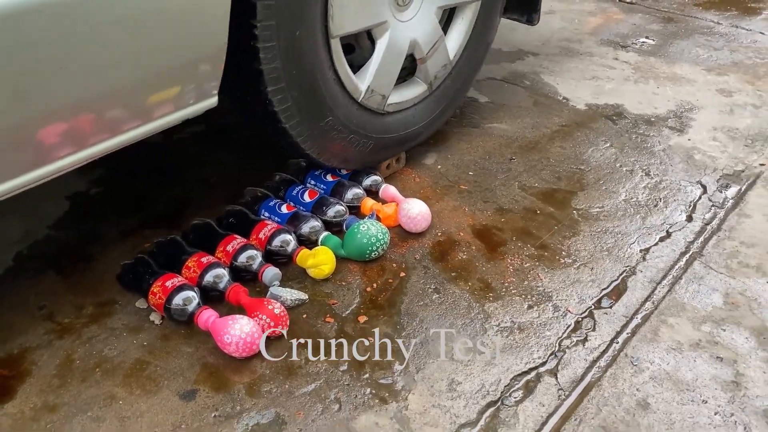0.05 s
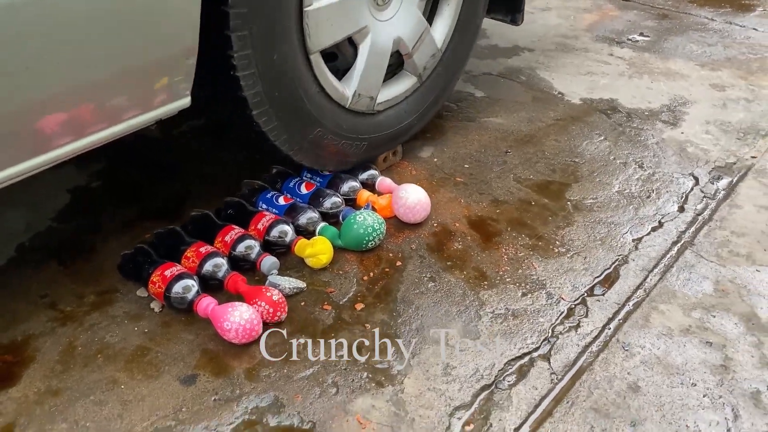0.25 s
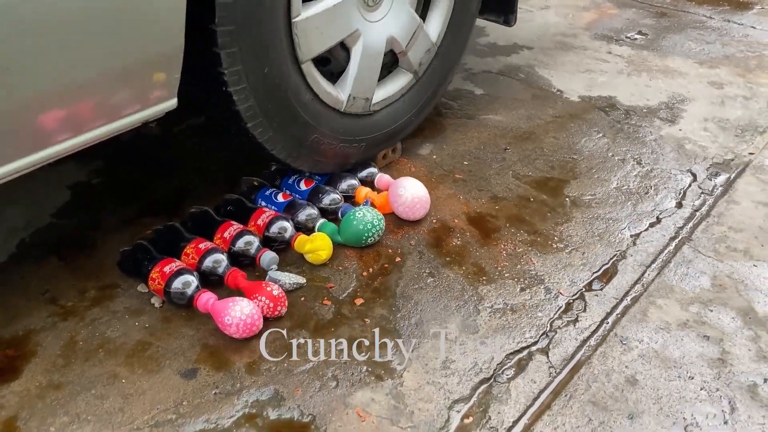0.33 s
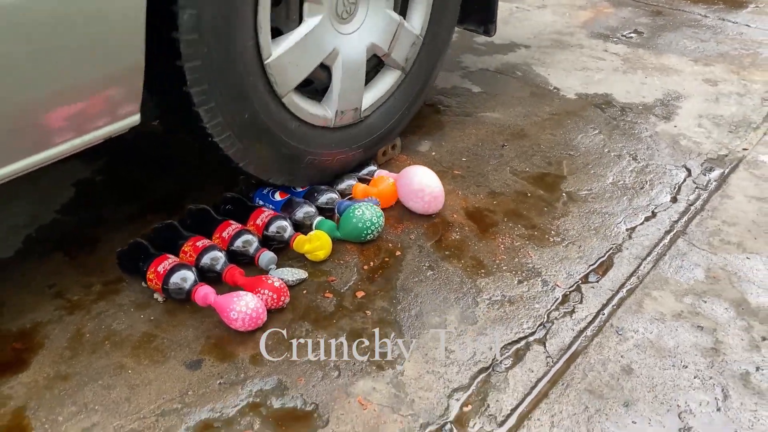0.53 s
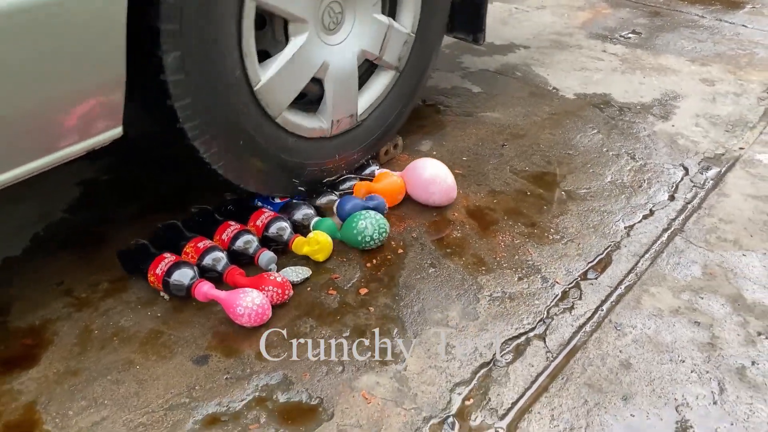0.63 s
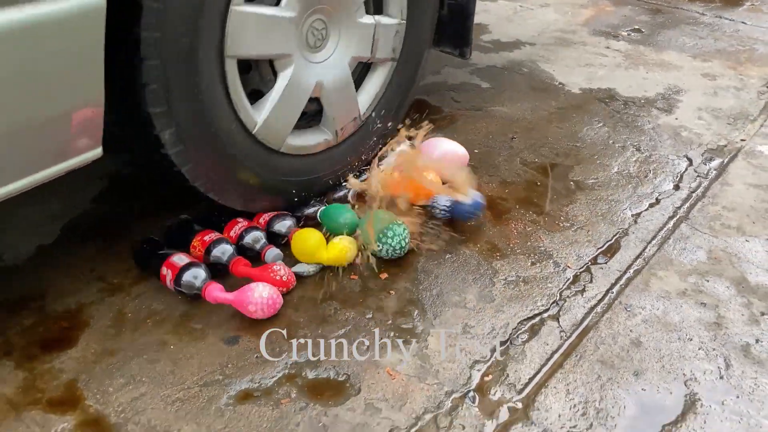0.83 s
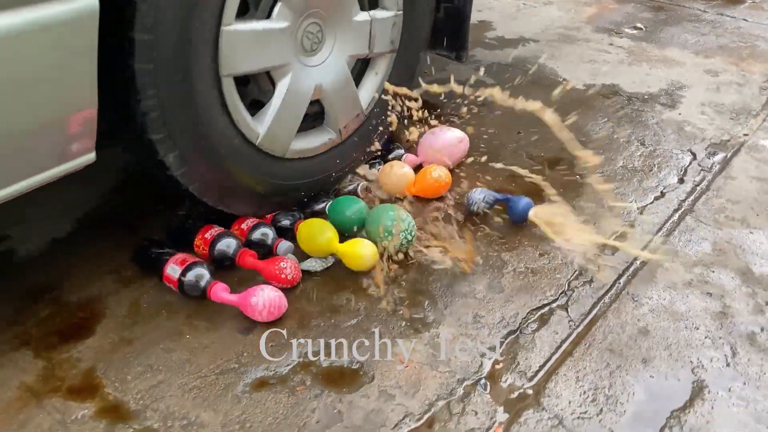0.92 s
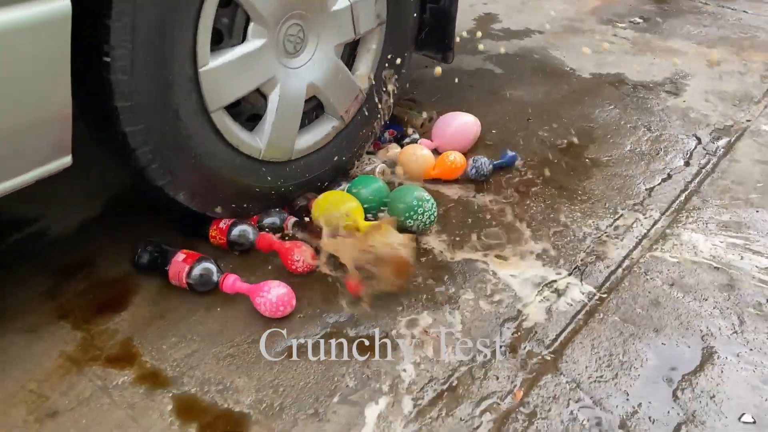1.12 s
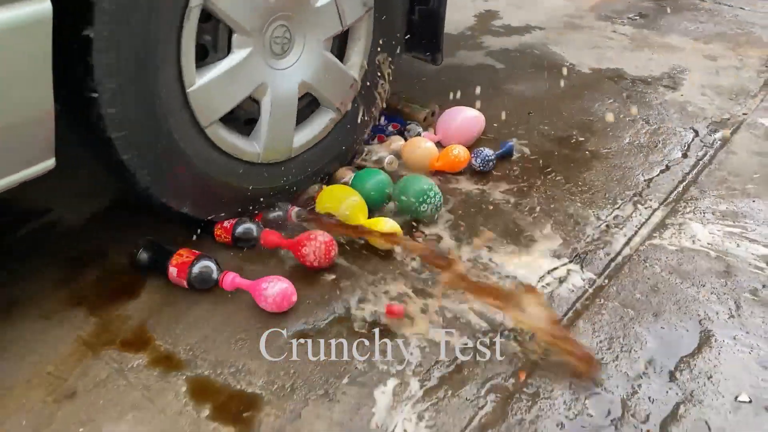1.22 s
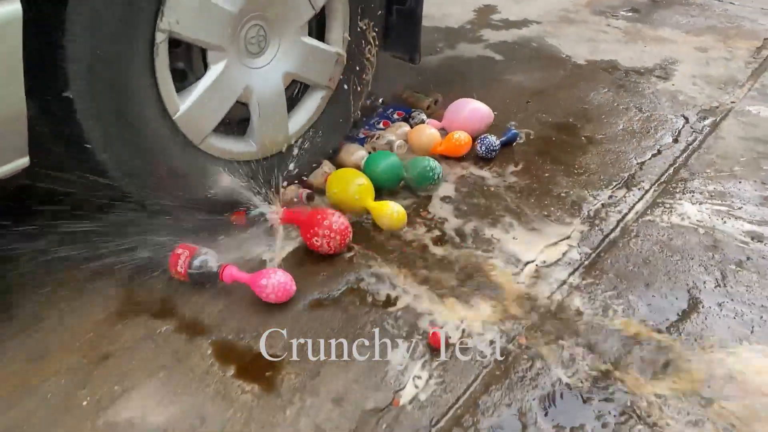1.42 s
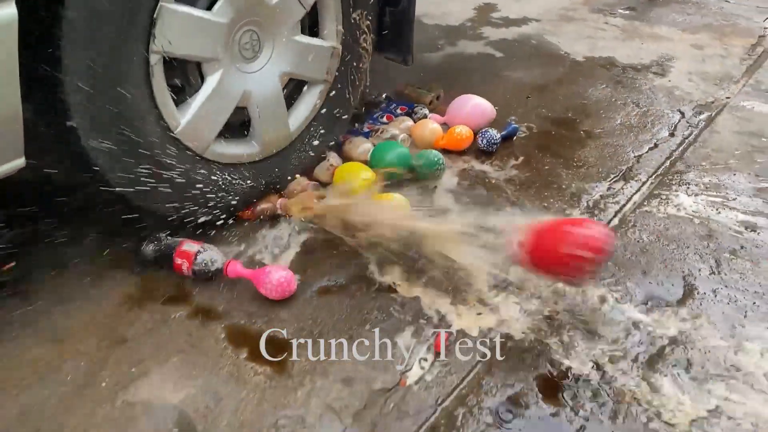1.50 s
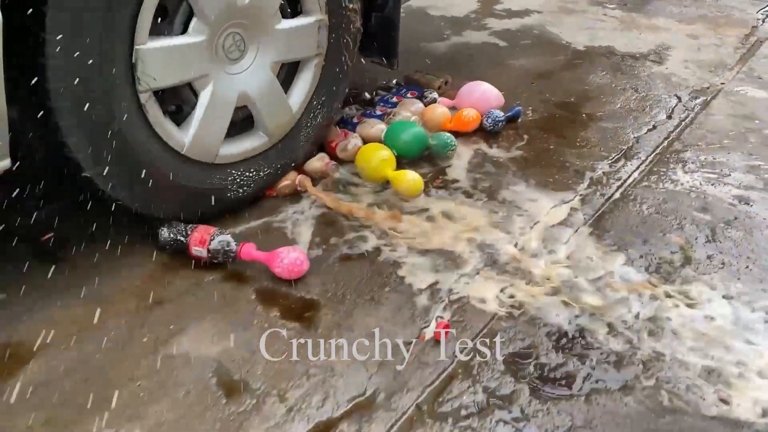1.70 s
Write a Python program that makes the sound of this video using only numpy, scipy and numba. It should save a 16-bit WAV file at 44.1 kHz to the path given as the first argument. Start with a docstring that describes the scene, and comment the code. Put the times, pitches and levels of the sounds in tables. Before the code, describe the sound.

Plastic soda bottles crack and pop under a slowly rolling car tyre. Gas squeals thinly at first, then sharp cracks and hollow thumps lead to one hissing burst. Liquid spatters on concrete over a faint idling engine, close by outdoors.

```python
"""On wet concrete, a car tyre rolls slowly over a row of plastic soda bottles capped with balloons.
Gas squeals through a stretched rubber neck, the bottles crack and thump as they fold, and one bursts in
a hissing spurt. Grit crunches under the tread and soda spatters on the ground, over a bed of idling
engine and a little wind on the microphone."""
import sys
import numpy as np
from scipy import signal
from scipy.fft import rfft, irfft
from scipy.io import wavfile
from scipy.ndimage import uniform_filter1d
from numba import njit

SR = 44100
rng = np.random.default_rng(int(sys.argv[2]) if len(sys.argv) > 2 else 0)


def store_wav(level_fs):
    """Save 16-bit WAV to argv[1]."""
    pcm = np.round(np.clip(np.atleast_2d(level_fs), -1, 1) * 32767)
    wavfile.write(sys.argv[1], SR, pcm.T.astype(np.int16))


N = 77175
START_S, TOP_HZ = .1365, 15800

# Bottle walls cracking. Each row: start in seconds, ring pitch in Hz, five EQ gains in dB
# (one per band of CRACK_EQ_HZ), tail level in dB against the snap.
WALL_CRACKS = [(0.2531, 2270, -4, -8, 1.5, 6, -5.5, 1.5), (0.2918, 2500, -4, 11.5, 25, -8, -9, -18),
               (0.434, 2647, -9, -4, 7, -14, -21, 0.5), (0.4911, 1810, -14, 9, 14, 13, 0.5, -5),
               (0.5818, 1360, 1, 9.5, 13, 3.5, -4, -4.5), (0.6809, 1870, -13, -1, 1.5, -11.5, -31, -1.5),
               (0.714, 1040, 8, 16, 17, 17, 11.5, -3.5), (0.745, 1350, -15, 1, 1, -12, -22, 3),
               (0.8062, 650, 10, 7.5, 2, -15, -11, -4), (0.8558, 1790, 19, 9.5, 15, 16.5, 13, -6),
               (0.911, 1920, 0, 3.5, 2, 0, -22, -3), (0.9885, 300, 2, -7, -2, -11, -9, 3.5),
               (1.0444, 1430, 26, 5.5, 15, 10.5, -10, -7.5), (1.0659, 1760, 11.5, 11, 10.5, 6.5, 5, -0.5),
               (1.1717, 750, 16.5, 17, 11.5, 17, -12, -3), (1.2526, 2320, 19.5, 13, 10, 9, 0.5, -1),
               (1.2854, 4500, -3, -25, -6, -5, -10, 0), (1.3647, 700, -1.5, -7, -8, -37, -19, 5.5),
               (1.3983, 1620, 1, 7.5, 6, -32, -11, -2.5), (1.4586, 616, 11, 1.5, 3, -3.5, -16, 8.5),
               (1.4736, 430, 15, 12.5, 2.5, 2, 3.5, -3.5), (1.5045, 1980, 5, 1, -14, -16, -16, -5),
               (1.582, 3760, 14.5, -2, 4, -4.5, -20, -13), (1.6678, 540, -1, -17, -10, -28, -38, 1.5),
               (1.7099, 3920, 11.5, -2, -1, 3, -5, -6), (1.747, 946, 18, 9, 3, 1, -6, -16)]
# The bands of the crack EQ in Hz, low to high.
CRACK_EQ_HZ = [400, 1050, 2300, 5300, 11500]
# Shells ringing after the hardest cracks. Each row: start in seconds, pitch in Hz, level in dB,
# attack and decay in seconds.
SHELL_MODES = [(.7142, 1675, -22, .0005, 0.009), (.7142, 2640, -13, 0.00027, 0.0034),
               (.7142, 4030, -12.5, 0.00027, 0.0024), (.8554, 2720, -15, .0003, 0.0026),
               (1.0444, 2980, -25, 0.00038, .003), (1.2522, 2265, -11, 0.00044, 0.006),
               (1.2522, 2520, -8, 0.00043, 0.0024)]
# Hollow thumps of bottles and filled balloons. Each row reads as in SHELL_MODES.
HOLLOW_THUMPS = [(0.6101, 313, -2.5, 0.0011, .0025), (.628, 860, -21, .001, 0.0066),
                 (.7145, 734, -11, 0.0013, 0.008), (.7145, 1064, -22.5, 0.0012, 0.014),
                 (.785, 460, -18, 0.0031, 0.0099), (0.796, 87.5, -20, 0.0036, 0.0095),
                 (0.985, 230, -15.5, 0.0017, 0.0049), (1.0443, 446, -5, 0.00021, 0.0026),
                 (1.167, 620, -11.5, 0.0025, 0.0088), (1.172, 954, -18.5, 0.0028, 0.011),
                 (1.44, 310, -15, .002, 0.0041), (1.458, 111, -22, 0.0013, 0.015),
                 (1.461, 375, -4, 0.0015, 0.0055), (1.473, 461, -13.5, 0.0014, 0.011),
                 (1.6675, 506, -25, 0.00044, 0.0088)]
# The burst's envelope. Each row: time in seconds, jet level in dB, spray level in dB.
BURST_LEVELS = [(1.11, -71, -69), (1.14, -55, -48), (1.165, -51, -43), (1.182, -19.5, -25.5),
                (1.198, -10.5, -11.5), (1.205, -24, -15), (1.213, -5, -16), (1.23, -21, -13.5),
                (1.24, -24, -41), (1.275, -45, -47), (1.36, -47, -45), (1.42, -66, -77)]
# The jet's resonances at the height of the burst. Each row: centre in Hz, width in Hz, relative dB.
JET_RESONANCES = [(4470, 60, -3), (4825, 280, 2), (5430, 200, 0), (5900, 160, -1), (6250, 180, 4.5),
                  (9000, 700, -7), (3260, 240, -11), (1880, 780, -7)]
# Spits of gas ahead of the burst. Each row: peak time in seconds, centre in Hz, level in dB.
GAS_SPITS = [(1.129, 6500, -30.5), (1.143, 4200, -33), (1.163, 3600, -25)]
# The neck's squeal and the falling whistle below it. Each row: time in seconds, pitch in Hz, level in dB.
SQUEAL_PATH = [(.137, 5380, -28.5), (.15, 5400, -29.5), (.163, 5343, -35), (.187, 5380, -44),
               (.2, 5400, -32.5), (.235, 5380, -28.5), (.27, 5065, -30), (.3, 5040, -29.5),
               (.33, 5080, -24), (.35, 5042, -25), (.366, 4860, -25), (.387, 4873, -23.5), (.41, 5080, -27),
               (.436, 5500, -30.5), (.452, 5460, -35), (.47, 5270, -49), (.5, 5500, -110)]
LOW_WHISTLE_PATH = [(.137, 1740, -42), (.22, 1680, -36), (.3, 1580, -33.5), (.4, 1510, -39),
                    (.47, 1160, -32.5), (.53, 1000, -41), (.58, 1000, -110)]
# One faint high whistle: peak time in seconds, half-width in seconds, pitch in Hz, level in dB.
HIGH_WHISTLE = (.22, .028, 6700, -39)
# Fader moves for the grinding tread and the spattering soda. Each row: time in seconds, level in dB.
TREAD_LEVELS = [(.137, -45), (.35, -40.5), (.5, -40.5), (.56, -34), (.63, -30.5), (.69, -38.5),
                (.74, -28.5), (.77, -36.5), (.8, -29), (.84, -32.5), (1.02, -35), (1.11, -39), (1.27, -29),
                (1.33, -40), (1.42, -43), (1.47, -29), (1.53, -37.5), (1.64, -41), (1.75, -41.5)]
SODA_LEVELS = [(.137, -42.5), (.25, -38), (.5, -33.5), (.56, -39.5), (.69, -43.5), (.735, -39.5),
               (.77, -34), (.84, -41), (.875, -35), (.94, -40.5), (1.08, -43.5), (1.11, -41), (1.28, -42),
               (1.36, -37), (1.45, -39), (1.51, -58), (1.523, -30), (1.55, -45), (1.68, -55), (1.75, -58)]
# The idling engine's partials. Each row: pitch in Hz, level in dB.
ENGINE_PARTIALS = [(178.8, -44), (127, -49.5), (51, -50.5), (394, -70), (452.6, -57)]
# EQ curves for soda spray, escaping gas, tread, droplets and wind.
# Each row: frequency in Hz, relative gain in dB.
SPRAY_EQ = [(300, -21), (1000, -8), (2200, -7.5), (3500, -2.5), (5000, 8), (7000, 2.5), (10000, -1),
            (13000, -7.5), (16000, -15)]
GAS_EQ = [(300, -33), (1000, -16), (2500, 4), (4500, 10), (7000, 6), (10000, 2), (13000, -18), (16000, -19)]
TREAD_EQ = [(120, -29), (250, -1), (450, -4), (800, -1), (1300, -7.5), (2200, -8.5), (4000, -18),
            (9000, -23), (16000, -39)]
DROPLET_EQ = [(400, -16.5), (1200, 5), (2500, 1.5), (4500, 2), (7000, -3.5), (11000, -8), (16000, -7)]
WIND_EQ = [(6, 5.5), (14, 0.5), (25, -4), (38, -12), (60, -19.5), (130, -15), (220, -15), (400, -34.5),
           (1500, -42), (8000, -73)]


def bottle_cracks(size=4096, snap_s=.00049, tail_s=.011):
    """A wall snaps through, flutters for a millisecond and rings; the sound scatters under the car."""
    out, t = np.zeros(N), np.arange(size) / SR
    for at, ring_hz, *band_db, tail_db in WALL_CRACKS:
        flutter = rng.standard_normal(size) * np.exp(-t / snap_s)
        tail = rng.standard_normal(size) * np.exp(-t / tail_s) * (1 - np.exp(-t / snap_s))
        tail = signal.lfilter([1], [1, -.39], tail)  # the scattered sound is duller
        push = undb(3) * flutter / np.linalg.norm(flutter) + undb(tail_db) * tail / np.linalg.norm(tail)
        push[0] += 1  # the snap itself
        eq = [(90, band_db[0] - 40), *zip(CRACK_EQ_HZ, band_db), (TOP_HZ, band_db[-1] - 7)]
        body = colour(push, eq)
        ring = resonate(body, np.full(size, float(ring_hz)), width=295.)
        add(out, undb(-3.5) * body + undb(-1) * ring, at)
    return out


def bottle_modes(modes, size=6000):
    """Damped modes: filled bodies thump low for a few cycles, thin shells ring higher."""
    out, t = np.zeros(N), np.arange(size) / SR
    for at, hz, db, attack, decay in modes:
        envelope = (1 - np.exp(-t / attack)) * np.exp(-t / decay)
        add(out, undb(db) * envelope * np.sin(2 * np.pi * hz * t), at)
    return out


def bottle_burst(peak_s=1.213):
    """Gas and soda sputter out of a burst bottle; the jet's resonances rise with the flow."""
    glide = 1 + 2.1 * np.clip(np.arange(N) / SR - peak_s, -.05, .008)
    jet = unit(sum(undb(db) * blown(hz * glide, width) for hz, width, db in JET_RESONANCES))
    spray = noise(SPRAY_EQ)
    sputter = undb(.77 * walk(600))
    return (jet * undb(curve(BURST_LEVELS)) + spray * undb(curve(BURST_LEVELS, column=2))) * sputter


def neck_squeal():
    """The rubber neck sings unsteadily in the escaping gas, with a rasp around its pitch and octave."""
    hz = curve(SQUEAL_PATH)
    waver = 1 + .0213 * walk(1500) + .00825 * walk(90)
    phase = 2 * np.pi * np.cumsum(hz * waver) / SR
    tone = unit(np.sin(phase) * undb(2.2 * walk(400)))
    rasp = undb(-1.5) * blown(hz, width=1050) + undb(-22) * blown(2 * hz, width=1050)
    air = undb(-7) * noise(GAS_EQ)
    voice = (tone + rasp + air) * undb(curve(SQUEAL_PATH, column=2))
    # For a moment the neck also flaps, rough and an octave down.
    flap = unit(np.sin(phase / 2) * undb(6.5 * walk(320)) + blown(hz / 2, width=250))
    return voice + undb(-28.5) * swell(at=.38, half_width=.037) * flap


def gas_whistles():
    """Fainter, airy whistles of gas sit above and below the squeal."""
    at, half_width, hz, db = HIGH_WHISTLE
    high = undb(db) * swell(at, half_width) * blown(hz, width=420)
    low = undb(curve(LOW_WHISTLE_PATH, column=2)) * blown(curve(LOW_WHISTLE_PATH), width=670)
    return high + low


def gas_leaks():
    """Gas spits through the first splits in the plastic."""
    return sum(undb(db) * swell(at, half_width=.0041) * blown(hz, width=3200) for at, hz, db in GAS_SPITS)


def tread_crunch():
    """Grit and plastic crunch under the tread."""
    crunch = unit(colour(grains(per_second=2200, spread_db=2.5), TREAD_EQ))
    return crunch * undb(curve(TREAD_LEVELS) + 1.76 * walk(59.87))


def soda_spatter():
    """Soda fizzes and its droplets land on the concrete."""
    drops = unit(colour(grains(per_second=9000, spread_db=5), DROPLET_EQ))
    return drops * undb(curve(SODA_LEVELS) + .4 * walk(90))


def engine_idle():
    """The engine hums at idle, its partials drifting together in pitch and apart in level."""
    engine_time = np.cumsum(1 + .0041 * walk(13)) / SR
    return sum(undb(db + 2 * walk(13.5)) * unit(np.sin(2 * np.pi * hz * engine_time))
               for hz, db in ENGINE_PARTIALS)


def wind():
    """Wind on the microphone makes a low rumble that slowly builds."""
    return noise(WIND_EQ, size=8192) * undb(-33.5 + 1.7 * np.arange(N) / SR)


def undb(db):
    """Decibels to gain."""
    return 10 ** (np.asarray(db) / 20)


def unit(x):
    """Scale to rms 1."""
    return x / np.sqrt(np.mean(x ** 2))


def curve(table, column=1):
    """One column of a table, joined by straight lines in time."""
    rows = np.array(table)
    return np.interp(np.arange(N) / SR, rows[:, 0], rows[:, column])


def add(out, sound, at):
    """Mix a sound in at a time in seconds."""
    i = max(int(at * SR), 0)
    part = sound[:max(N - i, 0)]
    out[i:i + len(part)] += part


def swell(at, half_width):
    """A bell-shaped fade up and down around a moment, in seconds."""
    return np.exp(-((np.arange(N) / SR - at) / half_width) ** 2 / 2)


def walk(rate_hz):
    """Smooth random modulation at rms 1."""
    hold = max(int(SR / rate_hz), 1)
    steps = np.repeat(rng.standard_normal(N // hold + 1), hold)
    return unit(uniform_filter1d(steps, hold)[:N])


def colour(x, eq, size=1024):
    """Minimum-phase EQ through points of Hz and dB."""
    hz, db = np.array(eq).T
    bins_hz = np.maximum(np.fft.rfftfreq(size, 1 / SR), 1)
    gain = undb(np.interp(np.log(bins_hz), np.log(hz), db))
    cepstrum = irfft(np.log(gain))
    cepstrum[1:size // 2] *= 2
    cepstrum[size // 2 + 1:] = 0
    return signal.fftconvolve(x, irfft(np.exp(rfft(cepstrum))))[:len(x)]


def noise(eq, size=1024):
    """Noise through an EQ curve, at rms 1."""
    return unit(colour(rng.standard_normal(N), eq, size))


@njit
def resonate(x, hz, width):
    """Sweepable band-pass with gain 1 at its centre; the width is in Hz."""
    out, band_state, low_state = np.empty(len(x)), 0., 0.
    for i in range(len(x)):
        tuning, damping = np.tan(np.pi * hz[i] / SR), width / hz[i]
        band = (band_state + tuning * (x[i] - low_state)) / (1 + tuning * (tuning + damping))
        band_state = 2 * band - band_state
        low_state += 2 * tuning * band
        out[i] = damping * band
    return out


def blown(hz, width):
    """Turbulence in a steep resonance, steady or gliding: noise band-passed twice."""
    centre = hz * np.ones(N)
    once = resonate(rng.standard_normal(N), centre, float(width))
    return unit(resonate(once, centre, float(width)))


def grains(per_second, spread_db):
    """Random tiny impacts, a few far stronger than the rest."""
    sizes = undb(spread_db * np.minimum(rng.exponential(size=N), 4))
    return (rng.random(N) < per_second / SR) * sizes * rng.choice([-1, 1], N)


def scene():
    """The mono mix, heard from beside the wheel."""
    bottles = bottle_cracks() + bottle_modes(SHELL_MODES) + bottle_modes(HOLLOW_THUMPS)
    gas = neck_squeal() + gas_whistles() + gas_leaks() + bottle_burst()
    ground = tread_crunch() + soda_spatter()
    bed = engine_idle() + wind()
    return (bottles + gas + ground + bed)[None]


def record(dry):
    """The sound cuts in hard; the microphone rounds the loudest peaks and rolls off the top."""
    high_cut = signal.ellip(8, .1, 50, TOP_HZ, fs=SR, output="sos")
    fade_in = np.clip((np.arange(N) / SR - START_S) / .001, 0, 1)
    live = signal.sosfilt(high_cut, dry) * fade_in
    rounded = live / (1 + (live / .74) ** 4) ** .25  # soft clip
    return signal.sosfiltfilt(high_cut, rounded)


dry = scene()
out = record(dry)
store_wav(out)
```